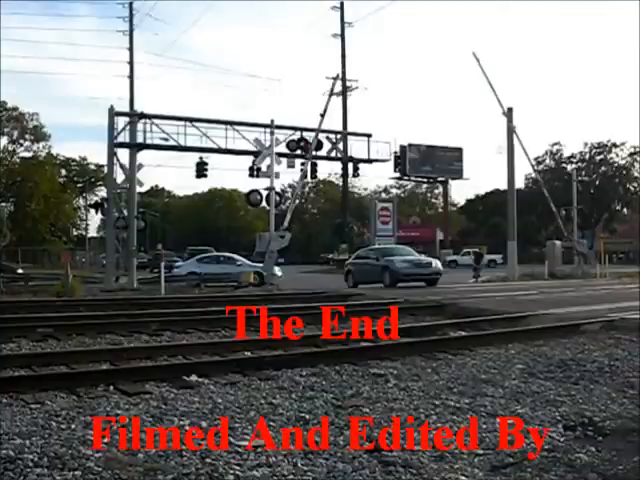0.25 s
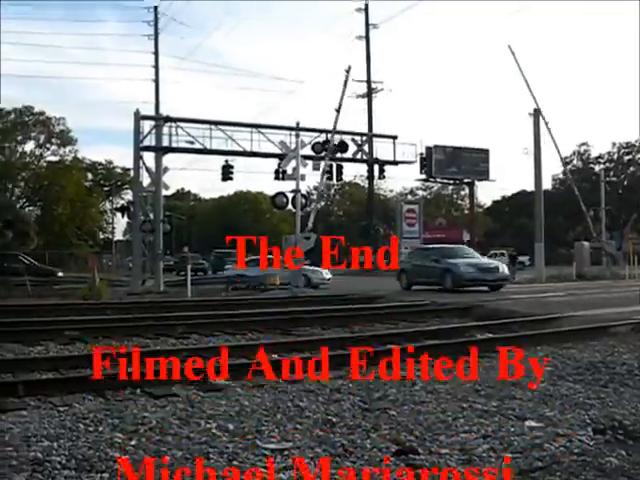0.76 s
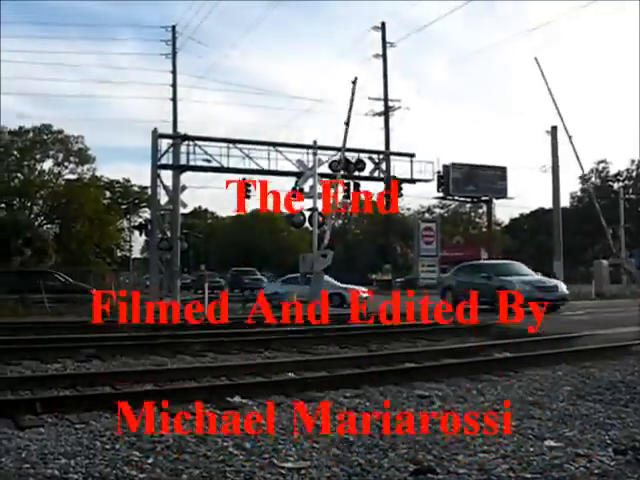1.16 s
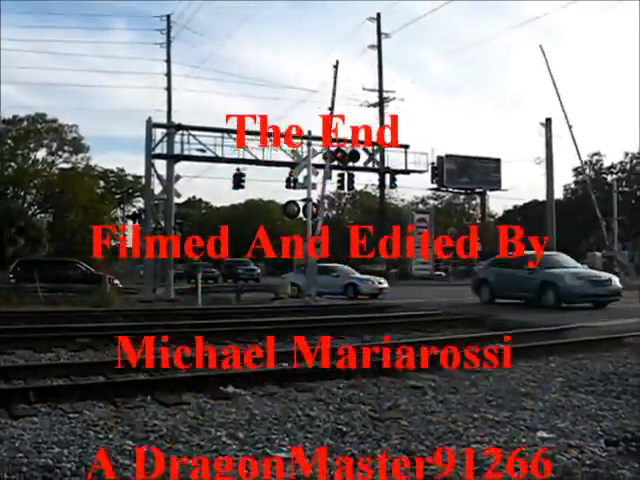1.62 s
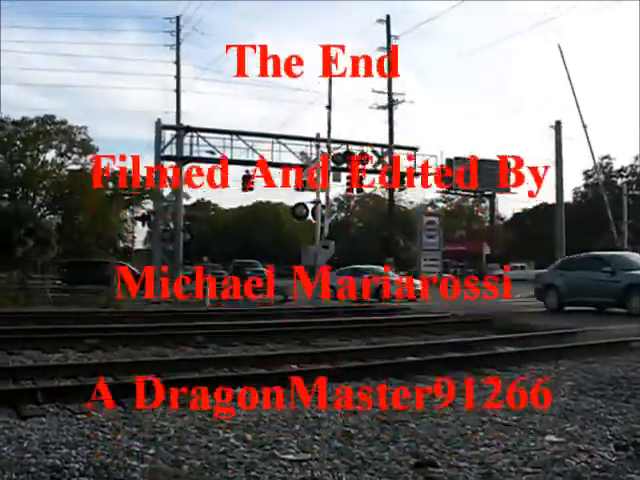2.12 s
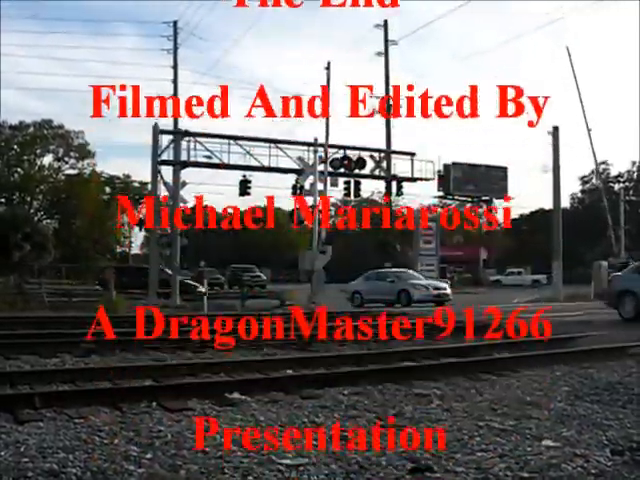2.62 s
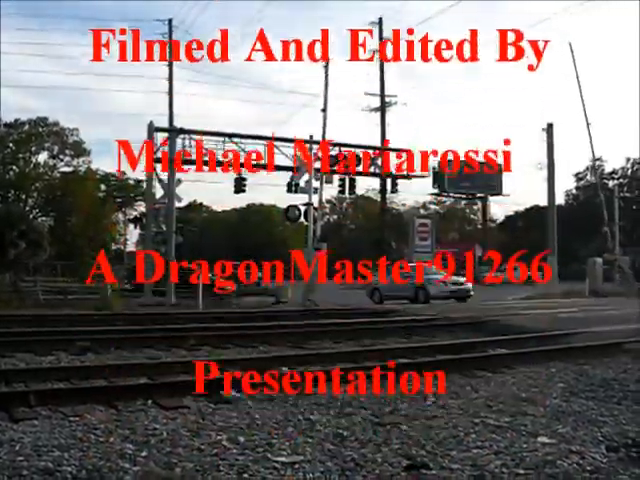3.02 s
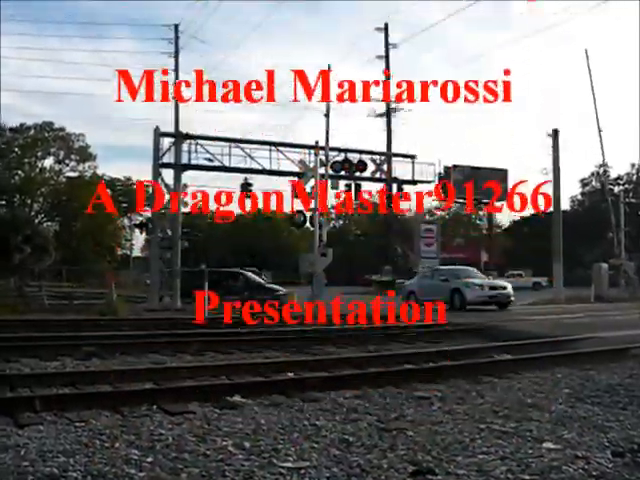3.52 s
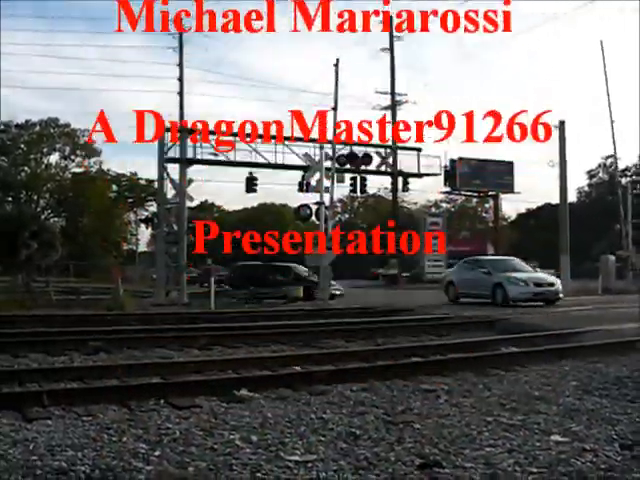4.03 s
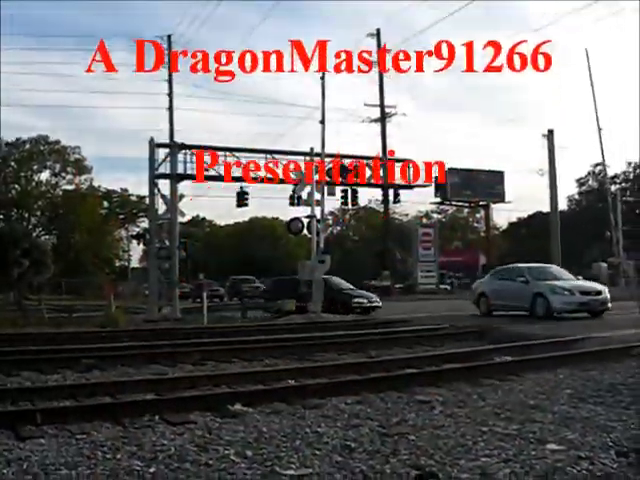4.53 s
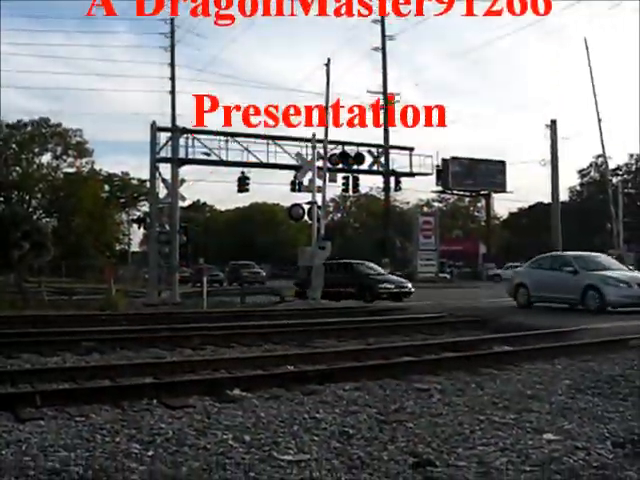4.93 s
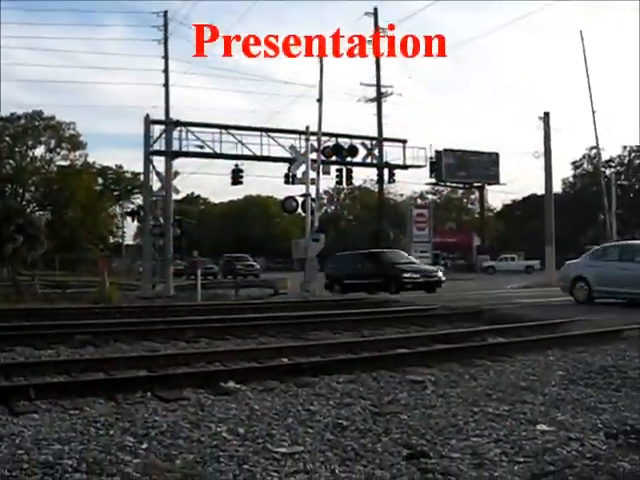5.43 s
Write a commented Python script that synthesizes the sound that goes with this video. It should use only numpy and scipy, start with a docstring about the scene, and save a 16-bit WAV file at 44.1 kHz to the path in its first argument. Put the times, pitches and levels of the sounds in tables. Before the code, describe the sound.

Low windy rumble throughout, with puffs thumping the microphone, strongest just before two seconds. Cars pass over rails in the open, giving short, dry, woody double knocks with quick rattling rebounds. The near engine's hum climbs in pitch, eases slightly and fades near five seconds as another engine rises. Faint thin squeals come early, tiny ticks and scrapes late; the camera dips in level after the hardest blows.

```python
"""Cars roll over a railroad crossing some way off: tyre noise comes and goes and a nearby engine hums from the start,
while a second engine holds a faint hum. Wind buffets the microphone, and hollow knocks and dry ticks soon join in.
Two thin squeals glide up in the first seconds, and short gritty scuffs come later, mostly near the end, where
the second engine grows loud. The sounds are shaped noise, gliding tones and decaying rings.
The camera's gain control ducks after strong blows, and its peaks are rounded off."""
import sys
import numpy as np
from scipy import signal
from scipy.fft import rfft, irfft, next_fast_len
from scipy.io import wavfile
from scipy.ndimage import map_coordinates

SR = 44100
rng = np.random.default_rng(int(sys.argv[2]) if len(sys.argv) > 2 else 0)


def digitize_waveform(pressure):
    """Quantize a signal to 16-bit integers and store it at the path in sys.argv[1].

    Rows of a 2-D input are taken as channels; values are limited to [-1, 1].
    """
    field = np.atleast_2d(pressure).T
    bounded = np.clip(field, -1, 1)
    quanta = np.round(bounded * 32767).astype(np.int16)
    wavfile.write(sys.argv[1], SR, quanta)


N = 249606  # length in samples


def amp(db):
    """Turn decibels into a gain."""
    return 10 ** (np.asarray(db) / 20)


def unit(x):
    """Scale a sound to rms 1."""
    return x / np.sqrt(np.mean(x ** 2) + 1e-20)


def clock():
    """Give the time of every sample in seconds."""
    return np.arange(N) / SR


def curves(rows):
    """Draw straight lines between the rows: one curve for each column after the time."""
    seconds, *columns = np.transpose(rows)
    return [np.interp(clock(), seconds, column) for column in columns]


def wobble(rate):
    """Draw a smooth random curve through this many random points a second."""
    points = rng.standard_normal(int(N * rate / SR) + 4)
    return map_coordinates(points, [clock() * rate])


def swell(t, rise, fall):
    """Draw a bell of height 1 at t = 0, with its own width on each side."""
    return np.exp(-.5 * (t / np.where(t < 0, rise, fall)) ** 2)


def strike(t, attack, t60):
    """Rise fast and die away exponentially, by 60 dB in t60 seconds; silent before t = 0."""
    t = np.maximum(t, 0)
    return (1 - np.exp(-t / attack)) * amp(-60 * t / t60)


def filtered(x, response):
    """Multiply the spectrum of x by a response that depends on frequency."""
    size = next_fast_len(N + SR // 2)
    spectrum = rfft(x, size) * response(np.fft.rfftfreq(size, 1 / SR))
    return irfft(spectrum, size)[:N]


def noise(spectrum, tilt_db=0):
    """Colour noise by (Hz, dB) points and a tilt in dB per octave; rms 1, silent above the last point."""
    points_hz, points_db = np.transpose(spectrum)

    def gain(hz):
        level_db = np.interp(np.log(hz + 1), np.log(points_hz), points_db, right=-np.inf)
        return amp(level_db + tilt_db * np.log2(hz + 1))

    return unit(filtered(rng.standard_normal(N), gain))


def band(hz, width_hz):
    """Make noise of rms 1 around a single resonance."""
    return unit(filtered(rng.standard_normal(N), lambda f: 1 / (1 + (2 * (f - hz) / width_hz) ** 2)))


def sine(hz):
    """Make a tone of rms 1 that follows a pitch curve."""
    return np.sqrt(2) * np.sin(2 * np.pi * (np.cumsum(hz) / SR + rng.random()))


def add(track, s, sound):
    """Mix a short sound into the track at time s."""
    part = track[round(s * SR):][:len(sound)]
    part += sound[:len(part)]


# Cars rolling by. Each row: loudest moment in seconds, time to half power in seconds,
# roar level in dB, hiss level in dB.
CAR_PASSES = [(.12, .12, -41.5, -57), (.55, 0.33, -35.5, -57), (1.999, 0.075, -32.5, -49.5),
              (3.25, 0.13, -44, -52), (4.251, 0.083, -52.5, -62), (4.68, .08, -39.5, -66),
              (5.3, 0.39, -34.5, -54)]
# Colour of the low rolling roar. Each row: frequency in Hz, relative level in dB per Hz.
ROAR_SPECTRUM = [(100, -39), (400, -14), (800, 5), (1300, 2.5), (1800, -8.5), (2600, -21), (5000, -60)]
# Colour of the tyre hiss. Each row: frequency in Hz, relative level in dB per Hz.
HISS_SPECTRUM = [(600, -26.5), (1700, -11.5), (2550, 3), (3100, 0), (3700, -2), (4300, -8.5), (5600, -10),
                 (6450, -8), (7300, -13), (9000, -19.5), (10300, -29), (12000, -85)]
# Narrow whines in the hiss. Each row: pitch in Hz, width in Hz, level in dB against the hiss.
TYRE_WHINES = [(1271, 45, 2), (2078, 35, -8), (2326, 60, -10), (2560, 80, -8), (2730, 45, -13),
               (3720, 140, -12)]
FAR_ROAR_DB, FAR_HISS_DB = -56, -56  # the steady traffic further off


def tyres():
    """Rolling noise with a few faint whines; each car's power falls with the square of its distance."""
    roar_power, hiss_power = amp(FAR_ROAR_DB) ** 2, amp(FAR_HISS_DB) ** 2
    for s, half, roar_db, hiss_db in CAR_PASSES:
        nearness = 1 / (1 + ((clock() - s) / half) ** 2)
        roar_power = roar_power + nearness * amp(roar_db) ** 2
        hiss_power = hiss_power + nearness * amp(hiss_db) ** 2
    roar_flutter = amp(1.5 * wobble(25) + 1.1 * wobble(90))
    roar = np.sqrt(roar_power) * roar_flutter * noise(ROAR_SPECTRUM)
    whines = sum(amp(db + 2 * wobble(3)) * band(hz, width) for hz, width, db in TYRE_WHINES)
    hiss = np.sqrt(hiss_power) * amp(wobble(1.7)) * (noise(HISS_SPECTRUM) + whines)
    return roar + hiss


# The nearest engine speeds up, then eases off. Each row: time in seconds, firing rate in Hz,
# then the relative levels in dB of 2, 3 and 4 times that rate.
NEAR_ENGINE = [(0, 29.5, -38, -35, -31), (.9, 33, -38, -29, -30), (1.5, 35.7, -40, -28, -35),
               (2.2, 39.8, -38, -28, -29), (2.45, 41.3, -23, -35, -31), (2.8, 42.4, -28, -25, -25),
               (3.15, 43.5, -22, -22, -25), (3.6, 43.8, -28, -26, -34), (3.88, 42.9, -27, -19, -34),
               (4.05, 42.3, -27, -28, -29), (4.2, 41.8, -30, -21, -25), (4.6, 41.3, -34, -20, -24),
               (4.95, 40, -35, -24, -30)]
ENGINE_DB, ENGINE_FADE_S = -1.5, 0.1  # overall gain; width of the fade after the last row


def engine():
    """From afar only low multiples of the firing rate are left, each swelling and fluttering on its own."""
    firing_hz, *levels = curves(NEAR_ENGINE)
    firing_hz = firing_hz * (1 + .003 * wobble(14))
    hum = sum(amp(db + 1.5 * wobble(9)) * sine(k * firing_hz) for k, db in enumerate(levels, 2))
    since_past = np.maximum(clock() - NEAR_ENGINE[-1][0], 0)
    leaving = swell(since_past, ENGINE_FADE_S, ENGINE_FADE_S)
    return amp(ENGINE_DB) * leaving * hum


# A second engine nears the tracks; its first row also holds for all the time before.
# Each row: time in seconds, firing rate in Hz, level in dB.
SECOND_ENGINE = [(4.7, 44.33, -44.5), (4.95, 46.74, -26.5), (5.3, 47.19, -27), (5.66, 49.84, -20.5)]
# The parts of its hum. Each row: multiple of the firing rate, relative level in dB.
SECOND_ENGINE_HUM = [(2, -5.5), (3, -0.5), (4, -4.5), (6, -13)]


def follower():
    """The next car's engine hums faintly, then rises in pitch and level as it nears the rails."""
    firing_hz, db = curves(SECOND_ENGINE)
    firing_hz = firing_hz * (1 + 0.012 * wobble(11))
    hum = sum(amp(level + 2.3 * wobble(8.1)) * sine(k * firing_hz) for k, level in SECOND_ENGINE_HUM)
    return amp(db) * unit(hum)


# Gusts that swell out of the breeze. Each row: peak in seconds, level in dB, rise width in seconds.
WIND_GUSTS = [(.09, -19, 0.074), (.44, -18.5, 0.055), (.7, -19, 0.25), (1.17, -25, 0.25),
              (1.8, -17.5, 0.069), (1.99, -10, 0.094), (2.525, -19.5, 0.024), (2.9, -24, 0.051),
              (3.12, -18.5, 0.033), (3.22, -19, 0.099), (3.99, -25, 0.058), (4.63, -19.5, 0.077),
              (4.95, -21.5, 0.22), (5.435, -18.5, 0.02)]
# Slow level of the low rumble, before the gusts raise it. Each row: time in seconds, level in dB.
SLOW_RUMBLE = [(0, -25), (.95, -24), (1.5, -28.5), (2.2, -17), (2.62, -27), (3.15, -27.5), (3.75, -27),
               (4.6, -23.5), (5.66, -24)]
# Colour of the low rumble. Each row: frequency in Hz, relative level in dB per Hz.
RUMBLE_SPECTRUM = [(20, -41), (42, -26.5), (60, -7), (85, -0.5), (125, 0.5), (170, -3.5), (260, -30.5),
                   (600, -75)]
# Colour of the brighter buffeting. Each row: frequency in Hz, relative level in dB per Hz.
BUFFET_SPECTRUM = [(50, -16), (110, -5.5), (200, 1.5), (300, -2), (450, -7.5), (720, -14), (1000, -26),
                   (1500, -31.5), (2500, -45.5), (5000, -60.5), (10000, -77.5)]
# Single puffs of wind. Each row: start in seconds, level in dB.
WIND_PUFFS = [(0.433, -2), (1.143, -5.5), (1.778, -7), (1.871, 3), (1.924, 5), (1.963, 5), (4.608, -3),
              (4.738, -0.5), (4.885, 1)]
BREEZE_DB, GUST_FALL = -23.5, 1.35  # buffeting between gusts; a gust's fall width over its rise width
RUMBLE_GROWS = 0.095  # dB of rumble for each dB of gust


def wind():
    """Gusts over a breeze drive bright buffeting and, more weakly, a lumpy rumble; puffs hit the microphone."""
    power = amp(BREEZE_DB) ** 2
    for s, db, rise in WIND_GUSTS:
        power = power + (amp(db) * swell(clock() - s, rise, GUST_FALL * rise)) ** 2
    strength_db = 10 * np.log10(power)
    rumble_db = curves(SLOW_RUMBLE)[0] + RUMBLE_GROWS * (strength_db - BREEZE_DB) + 0.44 * wobble(22)
    rumble = amp(rumble_db) * noise(RUMBLE_SPECTRUM)
    buffet = amp(strength_db + 1.17 * wobble(45)) * noise(BUFFET_SPECTRUM)
    out = rumble + buffet
    t = np.arange(SR // 8) / SR
    for s, db in WIND_PUFFS:
        # a pressure step swings for a few cycles in the microphone's bass cut
        swing_hz = 135 * np.exp(rng.normal(0, 0.1))
        add(out, s, amp(db) * strike(t, 0.0025, 0.061) * np.sin(2 * np.pi * swing_hz * t))
    return out


# The hollow body that every knock rings. Each row: multiple of the thump's pitch, relative level in dB,
# share of the thump's ring time.
HOLLOW_BODY = [(1.002, 4, 0.59), (1.242, -9, 0.52), (1.569, -2.5, 0.2), (2.301, -22, 0.055),
               (3.302, -13.5, 0.38)]
THUMP_RISE_S = 0.0035  # the body swells a moment after the contact
THUMP_SHARP, SETTLE_S = 0.53, 0.0027  # it starts this share above its pitch; time constant of settling


def thump(t, hz, t60):
    """The hollow body rings, sharp at first and then settling on its pitch."""
    cycles = hz * (t + THUMP_SHARP * SETTLE_S * (1 - np.exp(-t / SETTLE_S)))
    out = np.zeros(len(t))
    for multiple, db, share in HOLLOW_BODY:
        out -= amp(db) * strike(t, THUMP_RISE_S, t60 * share) * np.sin(2 * np.pi * multiple * cycles)
    return out


CLACK_RISE_S, CRACK_T60_S = 0.0015, 0.021  # onset; ring time of the noise burst


def clack(t, modes, t60, crack):
    """A hard contact rings some (Hz, dB) modes and adds a short burst cut from the crack noise."""
    ring = sum(amp(db) * np.sin(2 * np.pi * (hz * t + rng.random())) for hz, db in modes)
    burst = crack[rng.integers(N - len(t)):][:len(t)]
    return 0.67 * strike(t, CLACK_RISE_S, t60) * ring + strike(t, CLACK_RISE_S, CRACK_T60_S) * burst


# The knocks. Each row: start in seconds, thump level in dB, thump pitch in Hz, thump ring time (60 dB) in seconds,
# dull clack level in dB, dull clack pitch in Hz, sharp clack level in dB, its extra brightness in dB per octave,
# share of the strength left in each rebound.
KNOCK_BLOWS = [(.0415, -1, 255, .075, -1, 867, -21, -7, .15), (.7955, -8, 210, .06, -9, 820, -12.5, 3, .15),
               (.858, -20, 230, .05, -9.5, 880, -27, -3, .85),
               (.8992, 6.5, 240, .036, -2, 840, -12.5, -4.5, .35),
               (.9085, 2.5, 210, .11, -12, 800, -23, -1, .1),
               (2.1335, 14.5, 214, .066, 2, 760, -6.5, -.5, .42),
               (2.513, -11, 300, .03, -11, 750, -32, -6, .6), (3.191, -6, 280, .04, -11, 700, -32, -4, .1),
               (3.206, 0, 217, .055, -14, 800, -25, -3, .1), (3.3705, -18, 220, .04, -20, 800, -18, 1, .1),
               (3.3785, 12, 230, .036, 0, 820, -5.5, -3.5, .15),
               (3.3865, -8, 290, .04, -2, 850, -12, -6, .68), (3.3975, -1, 215, .14, -15, 810, -24, -5, .1),
               (3.4298, 1, 300, .045, -5, 880, -12, -2.5, .55),
               (3.5262, 6, 205, .024, -22, 900, -16, 2, .1), (3.995, -16, 280, .03, -12, 750, -34, -6, .4),
               (4.698, -14, 260, .04, -7, 800, -22, -2, .1), (5.284, -16, 280, .03, -8, 850, -32, -6, .4)]
# Colour of a crack's noise before tilting. Each row: frequency in Hz, relative level in dB per Hz.
CRACK_SPECTRUM = [(300, -14), (750, -3), (1150, -7), (1700, -3), (2450, -2), (2950, -17), (4400, -16),
                  (5300, -28), (9000, -45), (14000, -80)]
# The ringing modes of a dull clack. Each row: multiple of its pitch, relative level in dB.
DULL_MODES = [(.58, -7), (.78, -5), (.93, -2), (1.07, -4), (1.5, -13)]
# The ringing modes of a sharp clack. Each row: pitch in Hz, relative level in dB before brightness.
SHARP_RING = [(1320, -6), (1600, -4.5), (1880, -5), (2080, -1), (2280, -3), (2470, -5.5), (3420, -20),
              (3680, -18), (4220, -19.5), (4500, -21.5)]
DULL_T60_S, SHARP_T60_S = 0.024, 0.017  # ring times
DULL_CRACK_DB, DULL_TILT_DB = -8.5, -10  # crack noise of a dull clack: level, dB per octave
SHARP_CRACK_DB, SHARP_TILT_DB = -7, -1.5  # the same for a sharp clack, before its brightness
SHARP_PIVOT_HZ = 2090  # brightness tilts the sharp ring about this pitch
REBOUND_S, REBOUND_SCATTER_S = .0052, .0013  # spacing of contacts; random shift of each rebound
MODE_SCATTER = 0.025  # random spread of each mode's pitch, as a share


def knocks(count=5):
    """Each blow thumps once and rattles through uneven, ever weaker contacts, each a dull and a sharp clack."""
    out, t = np.zeros(N), np.arange(SR // 4) / SR
    dull_crack = amp(DULL_CRACK_DB) * noise(CRACK_SPECTRUM, DULL_TILT_DB)
    for s, thump_db, thump_hz, thump_t60, dull_db, dull_hz, sharp_db, bright_db, rebound in KNOCK_BLOWS:
        add(out, s, amp(thump_db) * thump(t, thump_hz, thump_t60))
        sharp_crack = amp(SHARP_CRACK_DB) * noise(CRACK_SPECTRUM, SHARP_TILT_DB + bright_db)
        for k in range(count):
            # each contact lands elsewhere and shifts the modes a little
            dull_modes = [(ratio * dull_hz * rng.normal(1, MODE_SCATTER), db) for ratio, db in DULL_MODES]
            sharp_modes = []
            for hz, db in SHARP_RING:
                tilted_db = db + bright_db * np.log2(hz / SHARP_PIVOT_HZ)
                sharp_modes.append((hz * rng.normal(1, MODE_SCATTER), tilted_db))
            # the first contact comes exactly on time
            delay = k * REBOUND_S + min(k, 1) * REBOUND_SCATTER_S * rng.standard_normal()
            dull = amp(dull_db) * clack(t, dull_modes, DULL_T60_S, dull_crack)
            sharp = amp(sharp_db) * clack(t, sharp_modes, SHARP_T60_S, sharp_crack)
            add(out, s + delay, rebound ** k * (dull + sharp))
    # soften the treble above 5200 Hz
    return signal.sosfilt(signal.butter(3, 5200, fs=SR, output="sos"), out)


# Small dry ticks. Each row: start in seconds, relative level in dB.
DRY_TICKS = [(0.107, -21), (.298, -20), (4.698, -11), (5.037, -14), (5.156, -12.5)]
# Colour of the grit in ticks and scuffs, before tilting. Each row: frequency in Hz, relative level in dB per Hz.
GRIT_SPECTRUM = [(500, -20), (1400, 6.5), (1950, 4.5), (2300, -0.5), (2800, 3.5), (3500, -2.5),
                 (4800, -15.5), (6100, -13), (6800, -23), (7600, -25), (8400, -35), (11000, -51.5),
                 (14000, -83.5)]
TICK_GAIN_DB, TICK_T60_S, TICK_TILT_DB = -13, 0.012, 1.5  # gain on all ticks, ring time, dB per octave


def ticks():
    """Dry ticks close by: gritty noise that starts at once and dies within milliseconds."""
    bursts = sum(amp(db + TICK_GAIN_DB) * strike(clock() - s, 0.00056, TICK_T60_S) for s, db in DRY_TICKS)
    return bursts * noise(GRIT_SPECTRUM, TICK_TILT_DB)


# Thin rising squeals. Each row: start in seconds, length in seconds, starting pitch in Hz, level in dB.
THIN_SQUEALS = [(0.67, 0.25, 6400, -68), (0.848, 0.26, 6300, -66)]
SQUEAL_RISE_HZ_PER_S = 1700


def squeals():
    """Thin wavering tones swell and glide upward, like a far brake."""
    out = np.zeros(N)
    for s, length, hz, db in THIN_SQUEALS:
        age = np.clip(clock() - s, 0, length)
        arch = np.sqrt(np.abs(np.sin(np.pi * age / length)))
        pitch_hz = hz + SQUEAL_RISE_HZ_PER_S * age + 65 * wobble(400)
        out += arch * amp(db + 3.5 * wobble(130)) * sine(pitch_hz)
    return out


# Gritty scuffs. Each row: middle in seconds, level in dB, bell width in seconds, brightness in dB per octave.
GRITTY_SCUFFS = [(2.375, -44, .02, -1.5), (5.2, -41.5, .026, 3), (5.245, -44.5, .02, 7),
                 (5.33, -49, .025, 7), (5.49, -44, .035, 0), (5.578, -32, 0.028, -1)]
# Rough resonances under the scuffs. Each row: pitch at the middle in Hz, level in dB before brightness lowers it.
ROUGH_RING = [(1950, -3), (2700, -5)]
RING_WOBBLES_PER_S, RING_SAG_HZ_PER_S = 170, 2500  # roughness of the ring; how fast it sinks


def scuffs():
    """Brief grainy scuffs close by: gritty noise with a rough ring that sinks as the contact slides."""
    t, out = clock(), np.zeros(N)
    for s, db, width, bright_db in GRITTY_SCUFFS:
        sag_hz = RING_SAG_HZ_PER_S * (t - s)
        ring = np.zeros(N)
        for hz, level in ROUGH_RING:
            # a duller scuff presses harder and rings more
            ring += amp(level - bright_db) * wobble(RING_WOBBLES_PER_S) * sine(hz - sag_hz)
        out += amp(db) * swell(t - s, width, width) * unit(noise(GRIT_SPECTRUM, bright_db) + ring)
    grain = unit(amp(2.6 * wobble(350) + 1.4 * wobble(70)))
    return out * grain


def scene():
    """Traffic beyond the tracks, with wind, knocks and grit at the microphone."""
    cars = tyres() + engine() + follower() + squeals()
    nearby = wind() + knocks() + ticks() + scuffs()
    return (cars + nearby)[None]


def gain_control(x, threshold_db, depth, release_db):
    """Peaks over the threshold pull the gain down; the pull eases by release_db a second."""
    peak = np.minimum(np.abs(x), .92)  # anything louder counts the same
    over_db = np.maximum(20 * np.log10(peak + 1e-9) - threshold_db, 0)
    ramp = release_db * clock()
    cut_db = np.maximum.accumulate(depth * over_db + ramp) - ramp
    # a 25 ms lag makes it too slow to catch the blow itself
    lag = np.exp(-1 / (0.025 * SR))
    return x * amp(-signal.lfilter([1 - lag], [1, -lag], cut_db))


TOP_HZ = 15650  # nothing is kept from here up


def record(dry):
    """The camera cuts deep bass, ducks after loud blows, rounds peaks at full scale and cuts the top treble."""
    x = signal.sosfilt(signal.butter(3, 55, "high", fs=SR, output="sos"), dry[0])
    x = gain_control(x, threshold_db=-1.29, depth=5.0, release_db=9)
    x = x / (1 + np.abs(x) ** 12) ** (1 / 12)
    return filtered(x, lambda hz: hz < TOP_HZ)[None]


dry = scene()
out = record(dry)
digitize_waveform(out)
```